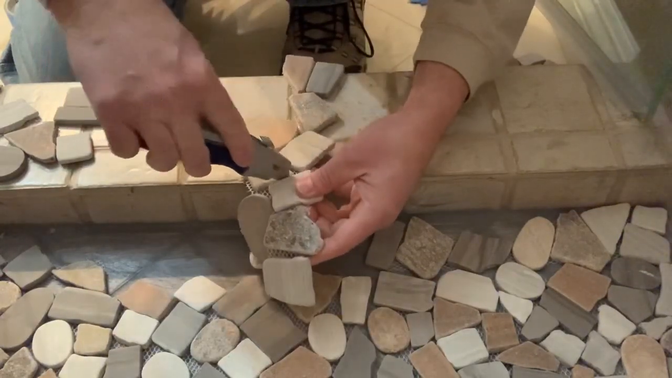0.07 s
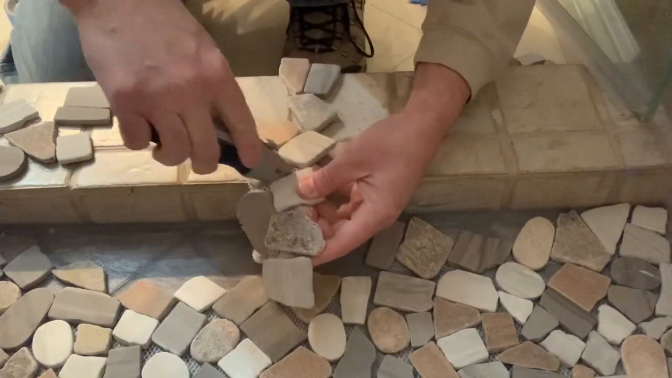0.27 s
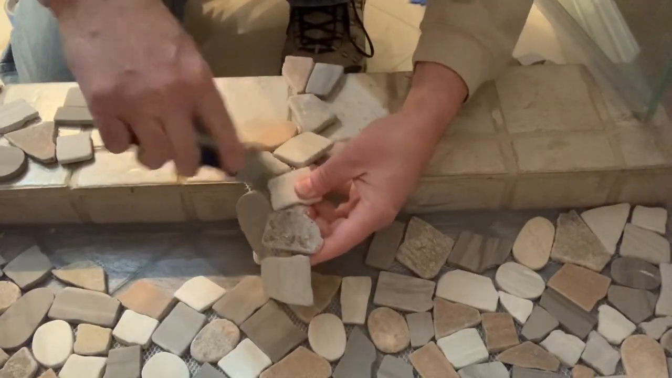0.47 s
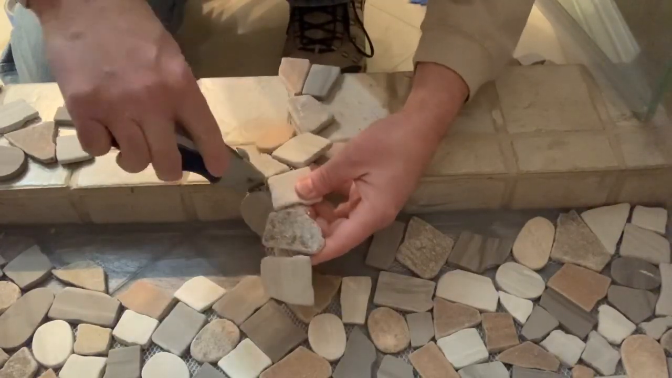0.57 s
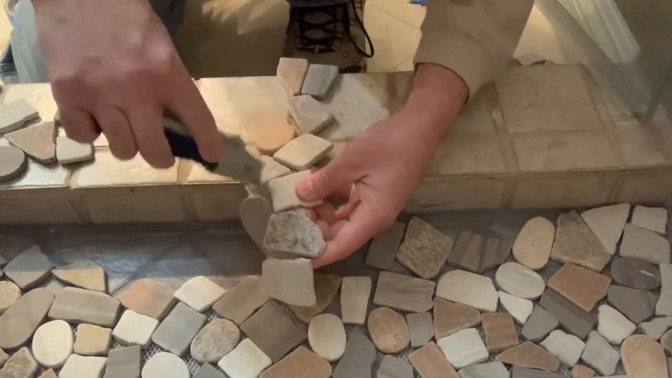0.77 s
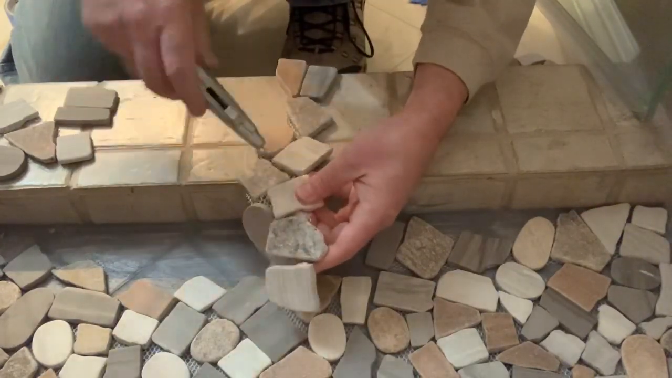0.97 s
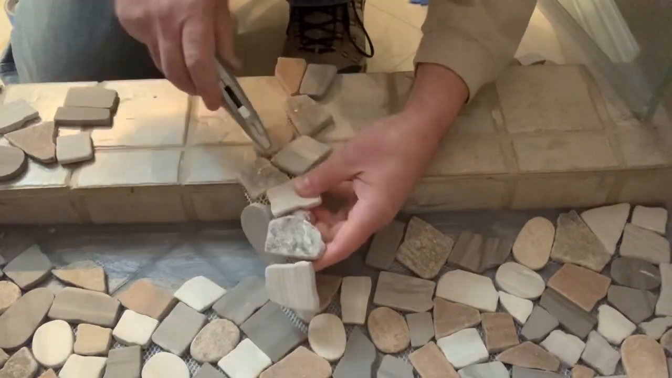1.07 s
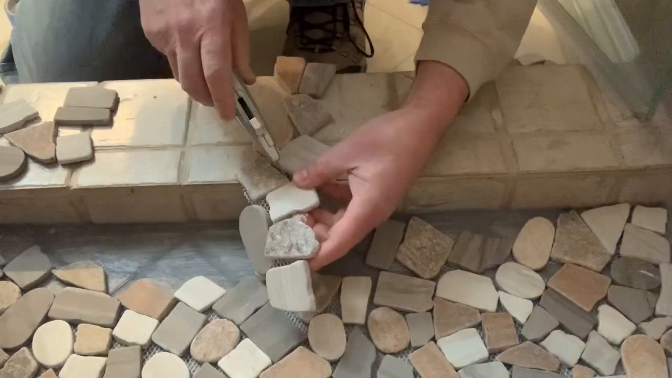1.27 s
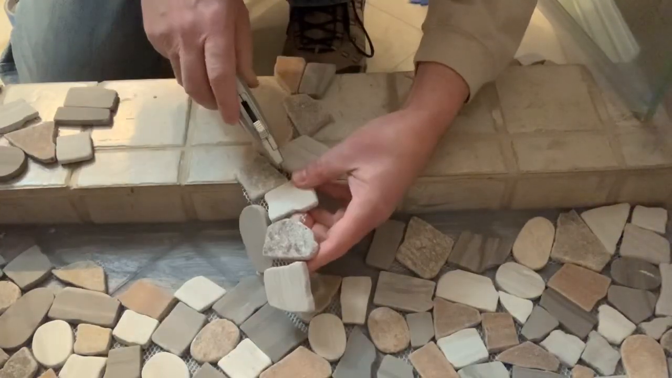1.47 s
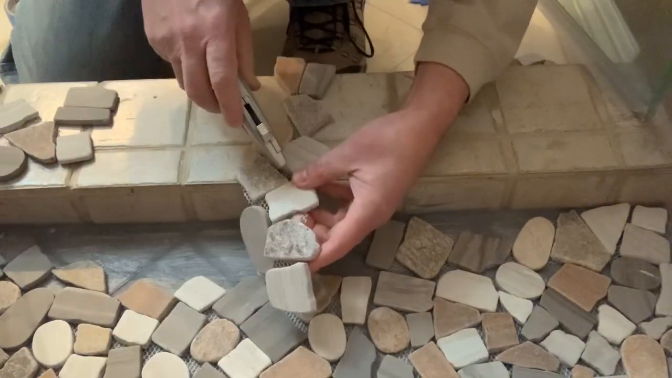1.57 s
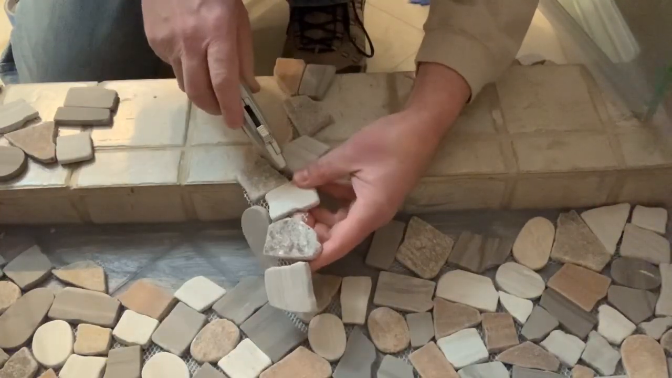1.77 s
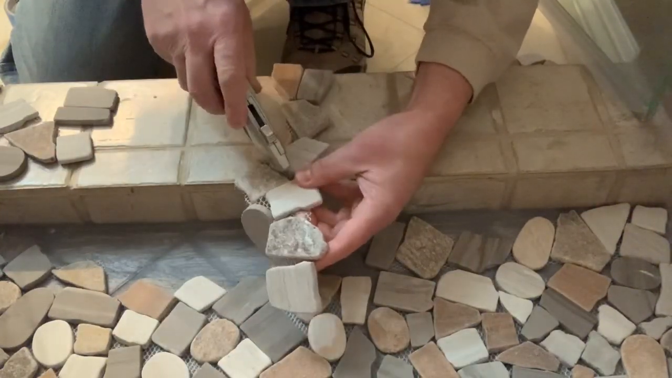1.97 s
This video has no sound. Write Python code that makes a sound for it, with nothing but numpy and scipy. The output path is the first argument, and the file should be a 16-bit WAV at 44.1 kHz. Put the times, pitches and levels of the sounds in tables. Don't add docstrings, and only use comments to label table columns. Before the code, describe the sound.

Two sharp, brittle stone cracks from hand nippers, followed by light pebble knocks and faint taps

```python
import sys
import numpy as np
from scipy import signal
from scipy.fft import rfft, irfft
from scipy.io import wavfile
from scipy.ndimage import uniform_filter1d

SR = 44100
rng = np.random.default_rng(int(sys.argv[2]) if len(sys.argv) > 2 else 0)


def log_audio(samples):
    frames = np.atleast_2d(samples).T
    limited = np.clip(frames, -1, 1)
    pcm = np.round(limited * 32767).astype(np.int16)
    wavfile.write(sys.argv[1], SR, pcm)


def ratio_of_db(decibels):
    return 10 ** (np.asarray(decibels, float) / 20)


N = 88200

# start_s, end_s, start_level_db, end_level_db
LOADS = [
    (0.2, 0.21, -57.5, -52.5),
    (0.214, 0.23, -30.5, -23.5),
    (0.428, 0.446, -34.5, -33),
    (1.153, 1.161, -63.5, -57),
    (1.679, 1.72, -82.5, -69.5),
    (1.252, 1.302, -70.5, -78),
    (1.425, 1.494, -65, -76.5),
    (0.00047, .06, -59.5, -77.5),
    (.505, .56, -48, -51.5),
]
# start_s, peak_db, ring_hz, treble_db, crumble_s
SNAPS = [(0.2212, -29, 4600, -2.5, 0.004), (0.2248, -11, 3400, 9.5, 0.0027),
         (0.2298, -23, 2780, -2.5, 0.0017), (0.234, -24.5, 3000, 3.5, 0.0056),
         (0.236, -29.5, 4540, 8, 0.0032), (0.245, -31.5, 4430, 13, 0.0091),
         (0.296, -42.5, 3984, 18, 0.0037), (0.3153, -21.5, 13700, 6.5, 0.002),
         (0.318, -32, 5560, -19.5, 0.0034), (0.4358, -26.5, 2620, 2.5, 0.0054),
         (0.4482, -17, 5560, 9, 0.0018), (0.451, -18.5, 2850, 8.5, 0.0041), (0.458, -31, 2700, 11, 0.00035),
         (.483, -28.5, 10800, 8, 0.0054), (0.486, -31, 3730, -3, 0.00063), (0.504, -42.5, 2980, 22, 0.0011),
         (0.557, -53.5, 2810, 7, 0.025)]
# start_s, peak_db, ring_hz, treble_db, crumble_s
KNOCKS = [
    (0.6227, -34.5, 3560, 4.5, 0.0015),
    (0.625, -45, 4600, -15, 0.0039),
    (0.632, -53.5, 2870, -7, 0.0066),
    (0.692, -41.5, 5740, -9.5, 0.0038),
    (0.723, -47.5, 5710, -2, 0.0064),
    (0.7339, -40.5, 3690, 5.5, 0.0052),
    (0.769, -76, 2830, -26, 0.0033),
    (0.878, -66.5, 1320, -4, 0.01),
    (0.898, -61.5, 1292, -13, 0.012),
]
# start_s, peak_db, ring_hz, treble_db, crumble_s
TAPS = [(0.082, -67, 2100, -6, 0.017), (1.1647, -37.5, 3600, 6, 0.004), (1.167, -42.5, 4140, 6.5, 0.0058),
        (1.2616, -42.5, 3400, 3.5, 0.0038), (1.269, -47.5, 3350, 6.5, 0.0091),
        (1.421, -63.5, 4080, -2, 0.016), (1.448, -60.5, 4110, -13, 0.015),
        (1.457, -61.5, 12640, 3.5, 0.017), (1.5744, -59, 2960, -0.5, 0.0038),
        (1.587, -74.5, 3000, -2, 0.007), (1.713, -60.5, 2860, -5.5, 0.01),
        (1.7155, -56.5, 4500, -0.5, 0.0029), (1.722, -72, 2770, 11, 0.023), (1.872, -69, 12000, 2.5, .004),
        (1.949, -58, 5000, 6, 0.0097), (1.992, -64, 1470, -6.5, 0.0021)]
# start_s, level_db, pitch_hz
PINGS = [
    (0.6913, -33, 2990),
    (0.7019, -36, 2960),
    (0.713, -44.5, 2960),
    (0.724, -40.5, 2920),
]
# start_s, level_db, pitch_hz, width_hz, decay_s
RINGERS = [(0.0, -64.5, 2320, 367, 0.061), (0.223, -42.5, 1530, 150, 0.012),
           (.223, -20.5, 4640, 400, 0.0045), (.239, -37, 4200, 150, .015), (.316, -49, 1560, 150, 0.0053),
           (.436, -31.5, 1150, 100, 0.0099), (.449, -23.5, 2895, 204, 0.0083),
           (.483, -44, 10800, 403, 0.045), (.622, -52, 2380, 200, 0.023), (.693, -53, 1130, 302, 0.0034),
           (.737, -42, 3690, 200, 0.0042), (.724, -46, 2950, 200, 0.0076), (.78, -59.5, 681, 24.8, 0.31),
           (.87, -61.5, 12000, 400, 0.032), (1.431, -51.5, 4020, 200, .02), (1.43, -62, 1600, 241, .04),
           (1.445, -56, 12700, 395, 0.026), (1.577, -69, 1480, 300, .02), (1.716, -64.5, 1600, 400, 0.032)]
# pitch_hz, level_db
STONE_BODY = [(1380, -15), (1363, -2), (1600, -18)]
# frequency_hz, gain_db
STONE_TONE = [(250, -26), (780, -16), (1100, -2.5), (3000, -1.5), (5200, -1.5), (7500, -6), (12800, -6.5),
              (16000, -21.5)]
# pitch_hz, width_hz, level_db
ROOM_MODES = [(238, 14, 0.5), (307, 3.9, 9), (375.6, 7.5, 8), (402, 4.9, 11), (641, 8.2, 1),
              (707, 4.3, 16.5), (817, 12, -0.5), (935, 11, 5)]
# frequency_hz, t60_s
BATH_T60 = [(150, 0.14), (500, 1), (1200, 0.49), (3000, 0.38), (7000, 0.24), (14000, 0.17)]
# frequency_hz, gain_db
BATH_TONE = [(300, 2), (1500, -2.5), (5000, -2), (9000, -2.5), (14000, -4)]
# start_s, level_db
BUMPS = [
    (0.093, -62),
    (0.272, -39),
    (0.46, -41),
    (0.535, -38.5),
    (0.741, -44),
    (0.879, -56.5),
    (1.173, -54.5),
    (1.261, -55.5),
]
# time_s, level_db
GRIT_LEVEL = [(0, -82), (.75, -78.5), (0.949, -73.5), (1.12, -67), (1.3, -68.5), (1.472, -101),
              (1.6, -84.5), (2, -104.5)]
# frequency_hz, gain_db
GRIT_TONE = [(800, -23), (3000, -13), (7500, -9), (10000, -4), (12700, 1), (15000, -9.5)]
# pitch_hz, width_hz, level_db
HUM = [(66.47, 2.8, 1), (95.13, 7.7, 5)]
# time_s, level_db
HUM_LEVEL = [(0.0, -46), (0.17, -67), (0.26, -52.5), (0.36, -63), (0.452, -49.5), (0.78, -66.5), (0.8, -75),
             (0.99, -64), (1.03, -69), (1.35, -56), (1.39, -61.5), (1.79, -70), (1.951, -65.5), (2.0, -76)]
# frequency_hz, gain_db
HISS_TONE = [(76, -27.5), (130, -16.5), (233, -16.5), (444, -19), (917, -21), (1680, -28), (3610, -29.5),
             (12800, -39.5), (16000, -36)]
# time_s, gain_db
HISS_SWELL = [(0, 0), (.6, 8), (0.949, 5), (1.099, -5.5), (1.28, 4), (1.421, -9), (1.68, -3.5), (1.78, -1),
              (1.9, -4.5), (2, 2)]
# frequency_hz, gain_db
RUMBLE_TONE = [(8.8, -57.5), (15, -21.5), (41, 2), (81, 3.5), (113, -1), (146, -13.5), (200, -25.5),
               (260, -46), (440, -120)]
# start_s, end_s, edge_hz
TREBLE_EDGES = [(.15, .209, 8300), (.209, .245, 16000), (.31, .326, 16700), (.424, .456, 15800),
                (.456, .6, 14600), (.7, .78, 15700), (.95, 1.15, 15200), (1.15, 1.178, 16200),
                (1.178, 1.3, 14800), (1.424, 1.452, 15900), (1.572, 1.582, 16000), (1.712, 1.73, 15700),
                (1.948, 2.1, 15500)]

RING_DB, RING_WIDTH_HZ, PAN_DB = (-5, -5, -7), (900, 600, 1000), (0.3, -0.3, -0.05)
CRACKS_PER_S, CRACK_SPREAD_DB = 14000, 3
FIRST_CRACK, RISE_S, TREBLE_HZ = 3, 0.0004, 8000
SWELL = 0.6
PING_RISE_S, PING_FALL_S, RINGER_RISE_S = 0.0025, 0.0015, 0.002
PORT_LAG_S = 0.00007
RING_WET = 0.35
TAIL_TURN_S, SNAP_WAKES_DB, SNAP_LOW_DB = 0.33, 7, -6
EARLY_DB, EARLY_T60_S, BATH_DB, FIRST_WALL_S = -3, 0.03, 1.5, 0.005
THUD_DB, THUD_HZ = -45.5, 62
BUMP_SWELL_S = 0.012
BUMP_DAMPING = 1.8
HUM_PAN_DB, HISS_DB, RUMBLE_DB = 1.95, -75.5, -73.5
HUM_SAME, HISS_SAME = 0.98, 0.61
PORT_HZ, PORT_WIDTH_HZ, PORT_DB = 20000, 620, -25.5
TOP_HZ, TOP_SLOPE_DB_PER_KHZ, PATCHY_DB = 14200, 4.5, 1.5


def cracks(size):
    chance, weakness, side = rng.random((3, size))
    happens = chance < CRACKS_PER_S / SR
    strength = ratio_of_db(-CRACK_SPREAD_DB * np.log(weakness + 0.012))
    return happens * strength * np.sign(side - 0.5)


def click(db, hz, treble_db, length, ring_db, width, body):
    t = np.arange(3000) / SR
    length = max(length, 0.0005)
    rise = max(RISE_S, SWELL * (length - 0.003))
    drive = cracks(3000)
    drive[round(RISE_S * SR)] = FIRST_CRACK
    drive = drive * np.minimum(t / rise, 1) * np.exp(-np.maximum(t - rise, 0) / length)
    low = signal.lfilter(*signal.butter(3, TREBLE_HZ, "low", fs=SR), drive)
    high = signal.lfilter(*signal.butter(3, TREBLE_HZ, "high", fs=SR), drive)
    body_hz, body_db = body
    ring = ratio_of_db(ring_db + 14) * resonate(drive, hz, width)
    ring = ring + ratio_of_db(body_db + 12) * resonate(drive, body_hz, 280)
    parts = np.array([low + ratio_of_db(treble_db) * high, ring])
    return ratio_of_db(db) * parts / np.sqrt(np.sum(parts ** 2) / (SR * length))


def breaks():
    out = np.zeros((2, 2, N))
    kinds = zip([SNAPS, KNOCKS, TAPS], RING_DB, RING_WIDTH_HZ, STONE_BODY, PAN_DB)
    for table, ring_db, width, body, pan_db in kinds:
        bus = np.zeros((N, 2))
        for s, *row in table:
            add(bus, s, click(*row, ring_db, width, body).T)
        out += bus.T[:, None] * ratio_of_db([[pan_db], [-pan_db]])
    return out


def loads():
    out = np.zeros((N, 2))
    for start, end, start_db, end_db in LOADS:
        size = round((end - start) * SR)
        level = ratio_of_db(np.linspace(start_db, end_db, size))
        add(out, start, (level * evened(cracks(3500))[:size])[:, None])
    return out.T


def pings():
    out, t = np.zeros((N, 2)), np.arange(800) / SR
    fall = np.exp(-np.maximum(t - PING_RISE_S, 0) / PING_FALL_S)
    shape = np.minimum(t / PING_RISE_S, 1) ** 2 * fall
    for s, db, hz in PINGS:
        add(out, s, (ratio_of_db(db) * shape * np.sin(2 * np.pi * hz * t))[:, None])
    return out.T


def ringers():
    out, t = np.zeros((N, 2)), np.arange(9000) / SR
    for s, db, hz, width, decay in RINGERS:
        shape = np.minimum(t / RINGER_RISE_S, 1) * np.exp(-t / decay)
        add(out, s, (ratio_of_db(db) * shape * evened(resonate(cracks(9000), hz, width)))[:, None])
    return out.T


def stones():
    out = breaks()
    out[0] += loads()
    out[1] += pings() + ringers()
    click_gain = np.linalg.norm(colour(np.eye(1, 4096)[0], STONE_TONE))
    return np.apply_along_axis(colour, 2, out, STONE_TONE) / click_gain


def bath(crack, ring):
    turn = np.pi / 2 * np.arange(N) / SR / TAIL_TURN_S
    hz = np.fft.rfftfreq(N, 1 / SR)
    lag = np.exp(-2j * np.pi * hz * [[PORT_LAG_S], [0]])
    out = irfft(rfft(crack + ring) * lag, N)
    for share in (np.cos(turn), np.sin(turn)):
        sent = (crack + RING_WET * ring) * share
        out = out + signal.fftconvolve(sent, tail(), axes=1)[:, :N]
    for f, width, db in ROOM_MODES:
        mode_db = db + SNAP_WAKES_DB + SNAP_LOW_DB * (f < 500)
        out = out + ratio_of_db(mode_db) * resonate(crack, f, width)
    return out


def tail():
    taps = np.zeros((2, SR))
    at = np.arange(0, SR - 20, 20)
    at = at + rng.integers(0, 20, (2, len(at)))
    np.put_along_axis(taps, at, rng.choice([-1., 1.], at.shape), 1)
    hz, t, z = signal.stft(taps, SR, nperseg=256)
    z = z * ratio_of_db(read(BATH_TONE, hz)[:, None] - 60 * t / read(BATH_T60, hz)[:, None])
    late = signal.istft(z, SR, nperseg=256)[1]
    late = np.pad(late, ((0, 0), (round(FIRST_WALL_S * SR), 0)))[:, :SR]
    early = taps[:, ::-1] * ratio_of_db(-60 * np.arange(SR) / SR / EARLY_T60_S)
    early = ratio_of_db(EARLY_DB) * early / np.linalg.norm(early[0])
    return early + ratio_of_db(BATH_DB) * late / np.linalg.norm(late[0])


def thud():
    out, t = np.zeros(N), np.arange(9000) / SR
    shape = ratio_of_db(THUD_DB - 190 * t) * np.minimum(t / 0.021, 1)
    add(out, SNAPS[0][0], shape * np.sin(2 * np.pi * THUD_HZ * t))
    return out


def bumps():
    out, u = np.zeros((N, 2)), np.arange(3000) / SR / BUMP_SWELL_S
    for s, db in BUMPS:
        push = ratio_of_db(db) * u * np.exp(-u) * pair(1.0)[:, :3000]
        add(out, s - BUMP_SWELL_S, push.T)
    return sum(ratio_of_db(db + 14.5) * resonate(out.T, f, w * BUMP_DAMPING) for f, w, db in ROOM_MODES[1:4])


def grit():
    grains = pair(0.4) * (1 + 0.5 * abs(cracks(N)))
    return ratio_of_db(follow(GRIT_LEVEL)) * shaped(grains, GRIT_TONE)


def hum():
    noise = pair(HUM_SAME)
    tones = sum(ratio_of_db(db) * evened(resonate(resonate(noise, f, w), f, w)) for f, w, db in HUM)
    return evened(tones) * ratio_of_db(follow(HUM_LEVEL)) * ratio_of_db([[HUM_PAN_DB], [-HUM_PAN_DB]])


def floor():
    hiss = shaped(pair(HISS_SAME), HISS_TONE)
    rumble = shaped(pair(HUM_SAME), RUMBLE_TONE)
    return ratio_of_db(HISS_DB + follow(HISS_SWELL)) * hiss + ratio_of_db(RUMBLE_DB) * rumble


def evened(x):
    return x / np.sqrt(np.mean(x ** 2) + 1e-20)


def read(points, hz):
    f, value = np.transpose(points)
    return np.interp(np.log(hz + 1), np.log(f + 1), value)


def follow(points):
    s, db = np.transpose(points)
    return np.interp(np.arange(N) / SR, s, db)


def add(mix, s, sound):
    part = mix[round(s * SR):][:len(sound)]
    part += sound[:len(part)]


def resonate(x, hz, width):
    r = np.exp(-np.pi * abs(width) / SR)
    return signal.lfilter([1 - r, 0, r - 1], [1, -2 * r * np.cos(2 * np.pi * hz / SR), r * r], x)


def colour(x, points):
    log_gain = read(points, abs(np.fft.fftfreq(4096, 1 / SR))) * np.log(10) / 20
    taps = np.fft.ifft(np.exp(np.conj(signal.hilbert(log_gain)))).real
    taps = max(taps, taps[::-1], key=lambda v: np.sum(v[:200] ** 2))[:2048]
    return signal.oaconvolve(x, taps)[:len(x)]


def shaped(noise, points):
    hz = np.fft.rfftfreq(N, 1 / SR)
    return evened(irfft(rfft(noise) * ratio_of_db(read(points, hz)), N))


def pair(same):
    a, b = rng.standard_normal((2, N))
    same = np.clip(same, 0, 1)
    return np.array([a, same * a + np.sqrt(1 - same ** 2) * b])


def scene():
    return bath(*stones()) + thud() + bumps() + grit() + hum() + floor()


def low_pass(x):
    return signal.sosfilt(signal.butter(12, 16780, fs=SR, output="sos"), x)


def record(dry):
    heard = dry + ratio_of_db(PORT_DB) * resonate(dry, PORT_HZ, PORT_WIDTH_HZ)
    hz, t, z = signal.stft(heard, SR, nperseg=512)
    edge = np.full(len(t), TOP_HZ)
    for start, end, edge_hz in TREBLE_EDGES:
        edge[(t >= start) & (t < end)] = edge_hz
    z = z * (hz[:, None] < edge)
    patches = rng.standard_normal(z.shape[1:])
    patches = uniform_filter1d(patches, size=7, axis=0)
    patches = uniform_filter1d(patches, size=12, axis=1)
    patch_db = PATCHY_DB * evened(patches) * (hz > 1500)[:, None]
    slope_db = TOP_SLOPE_DB_PER_KHZ * np.maximum(hz - TOP_HZ, 0)[:, None] / 1000
    z = z * ratio_of_db(patch_db - slope_db)
    mix = signal.istft(z, SR, nperseg=512)[1][:, :N]
    return low_pass(mix)


dry = scene()
out = record(dry)
log_audio(out)
```